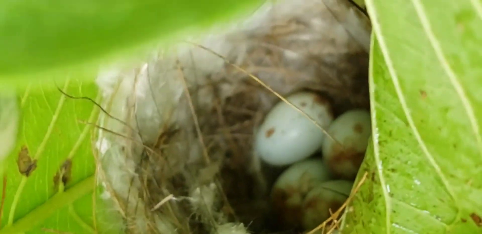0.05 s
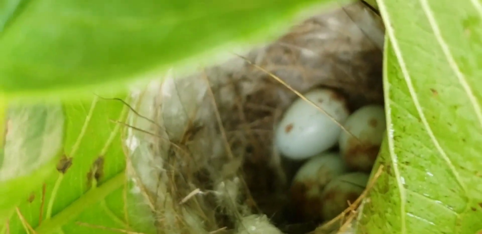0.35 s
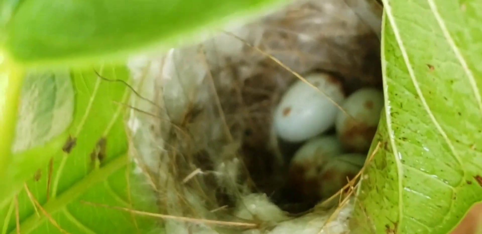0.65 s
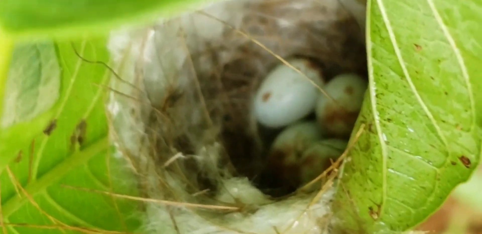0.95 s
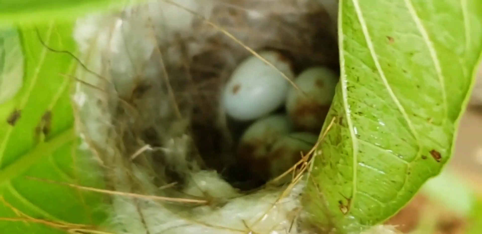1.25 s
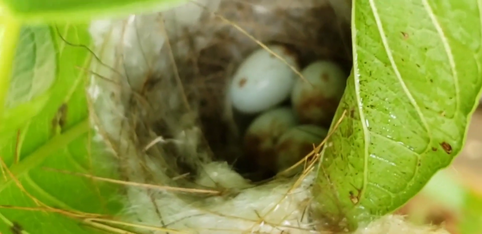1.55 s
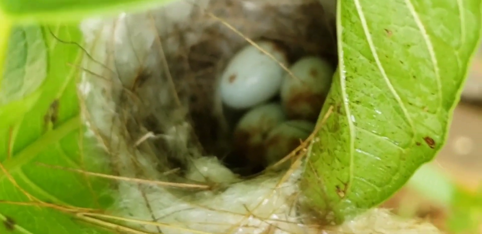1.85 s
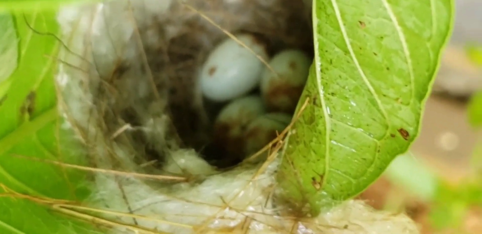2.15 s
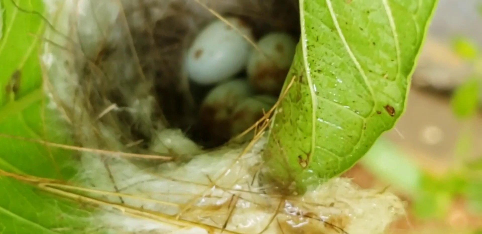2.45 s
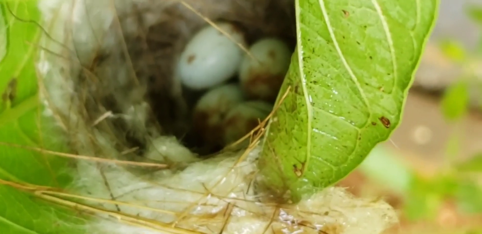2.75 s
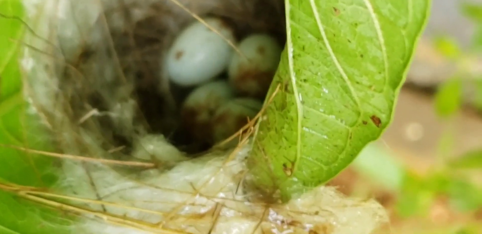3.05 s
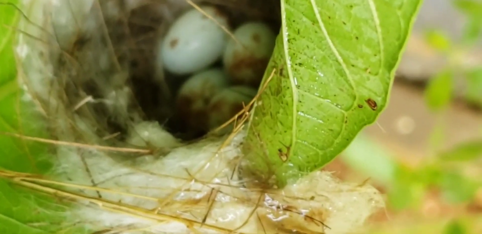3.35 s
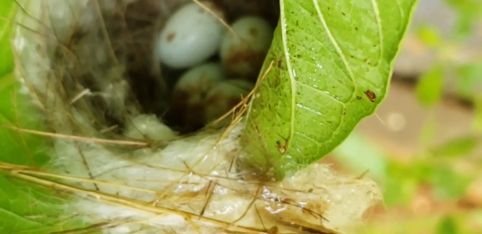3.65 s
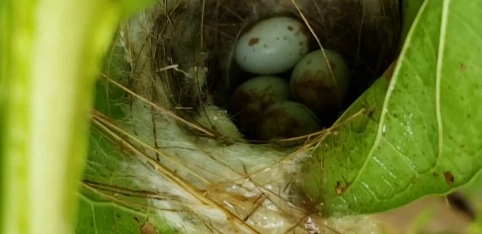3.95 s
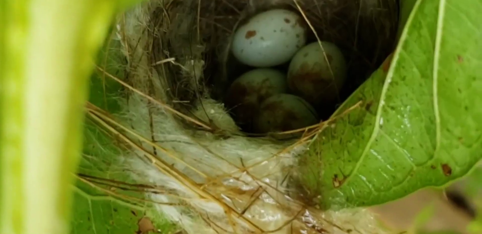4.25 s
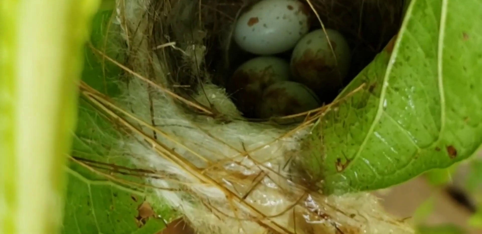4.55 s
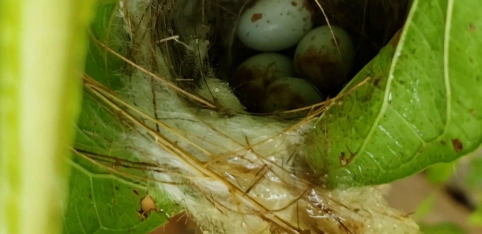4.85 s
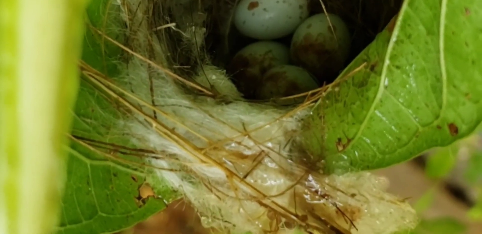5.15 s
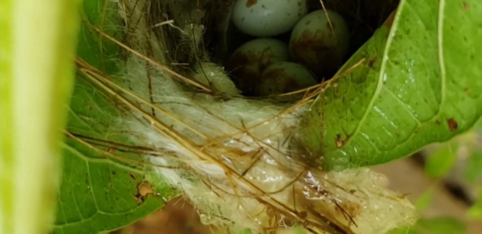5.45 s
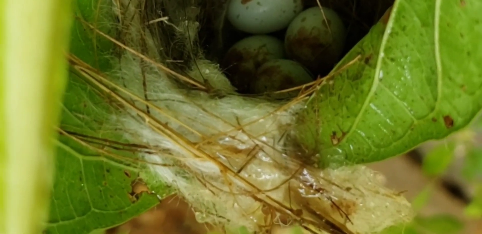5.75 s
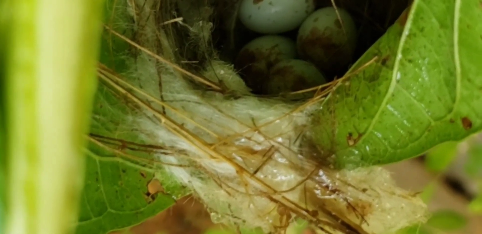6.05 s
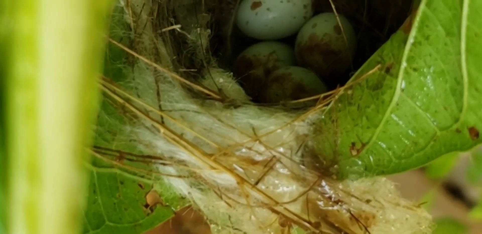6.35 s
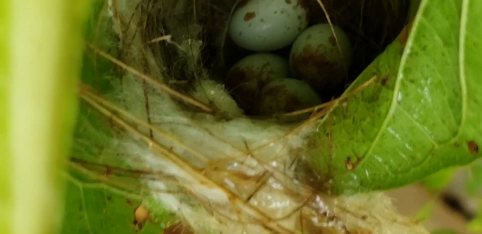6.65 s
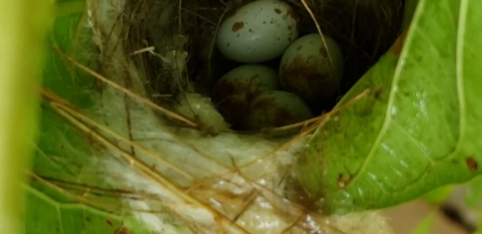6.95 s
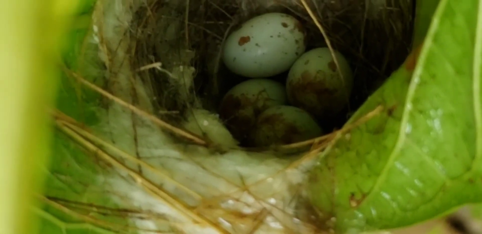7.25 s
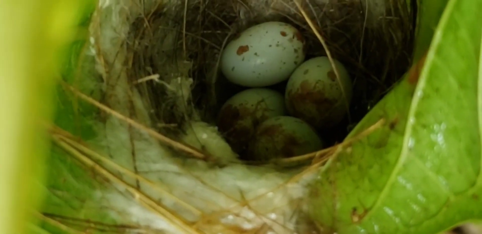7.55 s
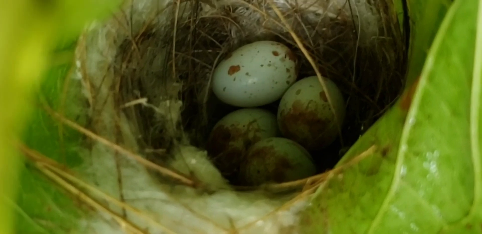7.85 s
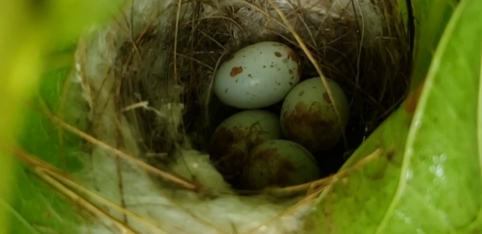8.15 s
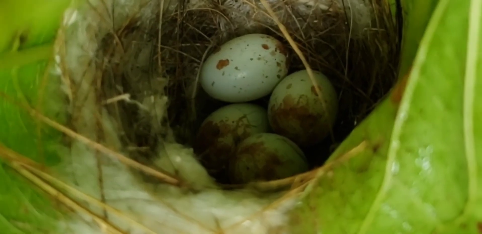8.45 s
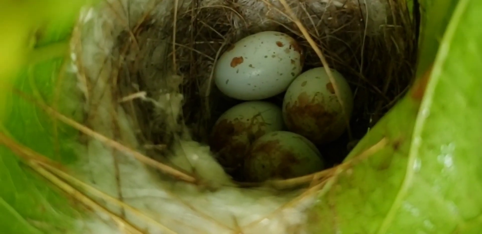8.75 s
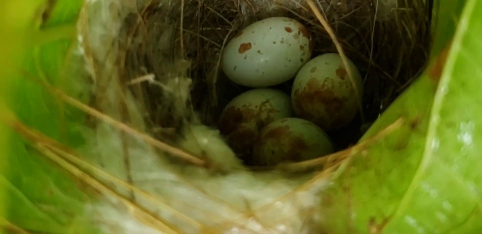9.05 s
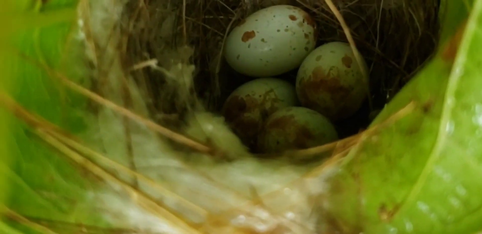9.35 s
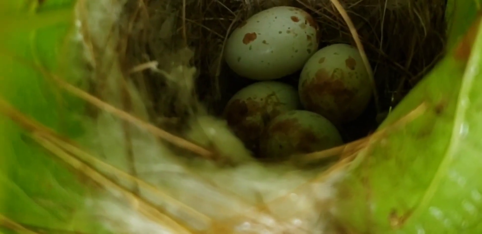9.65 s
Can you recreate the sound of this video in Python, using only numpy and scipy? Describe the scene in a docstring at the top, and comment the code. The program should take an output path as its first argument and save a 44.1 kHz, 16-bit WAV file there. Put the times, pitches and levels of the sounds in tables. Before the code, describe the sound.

A nearby small bird whistles the same rising and falling chirp about three times a second, in two runs split by a pause and a brief dropout. Other birds whistle and warble further away in the garden, over soft air and insect hiss. Handling adds low rumble, a few taps and leafy rubs at the microphone, most of all toward the end, when a far engine drones and picks up speed.

```python
"""A small bird close by in a garden whistles a rise and a fall, over and over; leaves scatter it and a wall
echoes it. Further off, a second bird and a warbler repeat their own phrases among distant calls, over air,
insects and a low rumble. At the microphone a hand shifts on the camera, which taps and brushes against
leaves. The sound drops out once and the garden swells back slowly. Near the end a far motor speeds up."""
import sys
import numpy as np
from scipy import signal
from scipy.fft import rfft, irfft, next_fast_len
from scipy.io import wavfile
from scipy.ndimage import uniform_filter1d

SR = 44100
rng = np.random.default_rng(int(sys.argv[2]) if len(sys.argv) > 2 else 0)


def unload_wav(signal):
    """Save mono or channel-first audio to the path in sys.argv[1] as 16-bit WAV at rate SR, clipped to [-1, 1]."""
    wavfile.write(
        sys.argv[1],
        SR,
        np.round(np.clip(np.atleast_2d(signal).T, -1, 1) * 32767).astype(np.int16),
    )


N = 433062
T = np.arange(N) / SR
DROPOUT_START_S, DROPOUT_END_S = 3.862, 3.984


def undb(db):
    """Decibels to gain."""
    return 10 ** (np.asarray(db) / 20)


def curves(rows):
    """Each column of a timed table, joined by straight lines."""
    times, *columns = np.transpose(rows)
    return [np.interp(T, times, column) for column in columns]


def add(track, start_s, sound):
    """Mix a sound into a track."""
    i = int(round(start_s * SR))
    a, b = max(i, 0), min(i + sound.shape[-1], N)
    if b > a:
        track[..., a:b] += sound[..., a - i:b - i]


def pan(db):
    """Left and right gains for a level difference; positive is to the left."""
    return undb(np.array([[.5], [-.5]]) * db)


def late(x, delay_s):
    """The same sound a little later."""
    return np.interp(T - delay_s, T, x, left=0)


def wander(rate_hz):
    """Smooth random drift with a spread near 1."""
    hold = int(SR / rate_hz)
    steps = np.repeat(rng.standard_normal(N // hold + 1), hold)
    return 1.3 * uniform_filter1d(uniform_filter1d(steps, hold), hold)[:N]


def colour(x, spectrum):
    """Shape a signal by (freq_hz, level_db) points, at rms 1."""
    hz, db = np.transpose(spectrum)
    size = next_fast_len(x.shape[-1])
    bins_hz = np.arange(size // 2 + 1) * SR / size
    gain = undb(np.interp(np.log(bins_hz + 1), np.log(hz), db))
    shaped = irfft(rfft(x, size) * gain, size)[..., :x.shape[-1]]
    return shaped / np.sqrt(np.mean(shaped ** 2))


def noise(spectrum, side_db, size=N):
    """Coloured stereo noise; side_db sets its width."""
    mid, side = rng.standard_normal((2, size))
    return colour(mid + undb(side_db) * side * np.array([[1], [-1]]), spectrum)


def stroke(start_s, length_s):
    """Contact pressure: quick to build, slower to ease off."""
    return np.interp(T, start_s + length_s * np.array([0, .18, .56, 1]), [.0024, 1.01, .5, .0026])


def scatter(x, delay_s, t60_s, build_s):
    """A cloud of small reflections that builds up and dies away, different at each microphone."""
    t = np.arange(int(.8 * SR)) / SR
    age = np.maximum(t - delay_s, 0)
    envelope = (1 - np.exp(-age / build_s)) * undb(-60 * age / t60_s)
    response = (rng.standard_normal((2, len(t))) * envelope)[:, age < t60_s]
    response /= np.sqrt(np.sum(response ** 2, axis=1, keepdims=True))
    return signal.oaconvolve(x[None], response, axes=1)[:, :N]


def bounce(sound, echo_db, reach_s=.012):
    """A bird turns its head, so each note meets other near surfaces and beats against their echoes."""
    response = np.zeros((2, int(reach_s * SR) + 16))
    response[:, 0] = 1
    for lag, skew in rng.random((3, 2)):
        left = int((.2 + .8 * lag) * reach_s * SR)
        right = left + int(skew * 8)
        response[[0, 1], [left, right]] += undb(echo_db)
    return signal.fftconvolve(sound[None], response, axes=1)


def further_off(voice):
    """A voice further from the microphone has more of the garden in its sound."""
    leaves = undb(-1) * scatter(voice.mean(0), delay_s=.002, t60_s=.22, build_s=.005)
    garden = undb(-6) * scatter(voice.mean(0), delay_s=.025, t60_s=.4, build_s=.012)
    return undb(-3) * (voice + leaves + garden)


def whistle(shape, ratio=1, waver=.01, flutter_db=3):
    """A tone gliding through (time_s, pitch_hz, level_db) points; pitch wavers and strength flutters."""
    times, hz, db = np.transpose(shape)
    t = np.arange(int(times[-1] * SR)) / SR
    knots = np.linspace(0, times[-1], 24)
    wobble, flutter = (np.interp(t, knots, row) for row in rng.standard_normal((2, 24)))
    pitch = np.interp(t, times, hz) * ratio * (1 + waver * wobble)
    strength = undb(np.interp(t, times, db) + flutter_db * flutter) * signal.windows.tukey(len(t), .08)
    return np.sqrt(2) * np.sin(2 * np.pi * np.cumsum(pitch) / SR) * strength


def slur(length_s, start_hz, end_hz, waver):
    """One plain gliding note that swells and fades."""
    shape = [(0, start_hz, -9), (length_s / 2, (start_hz + end_hz) / 2, 0), (length_s, end_hz, -9)]
    return whistle(shape, waver=waver)


def hard_whistle(shape, ratio):
    """A hard-blown syrinx wavers more and adds its octave."""
    tone = whistle(shape, ratio, waver=.014)
    octave = tone ** 2 - uniform_filter1d(tone ** 2, size=64)
    return bounce(tone + undb(-25) * octave, echo_db=-9.5)


# The whole garden at the microphone: time_s, level_db
GARDEN_LEVEL = [(3.86, 0), (3.98, -9.5), (5.6, -10), (6.2, -2.5), (6.7, .8), (7.3, 1.5), (9.8, 2.2)]
def swell():
    """The garden's gain sinks at the dropout and comes back slowly."""
    return undb(curves(GARDEN_LEVEL)[0])


# Open air, all round: freq_hz, level_db
AIR_SPECTRUM = [(60, -11), (150, -6.5), (220, 7), (330, -8.5), (550, -12.5), (800, -11.5), (1050, -20),
                (1900, -19.5), (3000, -10), (5900, -14), (7500, -26.5), (11000, -28.5), (15500, -18)]
def air():
    """A wide, restless hiss."""
    return noise(AIR_SPECTRUM, side_db=-3) * undb(-62.5 + 1.29 * wander(7.7))


# Insects, off to the left: freq_hz, level_db
INSECT_SPECTRUM = [(7800, -29), (8700, -15.5), (9300, -0.5), (9800, -8.5), (11200, -27.5)]
def insects():
    """A steady, high band of noise."""
    return noise(INSECT_SPECTRUM, side_db=-8.5) * undb(-76 + .6 * wander(25)) * pan(7.8)


# Low rumble at the microphone: freq_hz, level_db
RUMBLE_SPECTRUM = [(20, -27), (40, -16), (62, -1.5), (120, -12.5), (200, -22.5), (400, -52)]
# The hand jolts the camera case: start_s, length_s, level_db
JOLTS = [(0, 1.2, -61), (1.18, .3, -50), (1.45, 1.3, -55), (2.68, .5, -51), (3, .5, -60), (6.1, .9, -62),
         (8.8, 1.3, -51)]
def rumble(floor_gain):
    """A constant low rumble that grows with each jolt of the hand."""
    floor = floor_gain * undb(-60 + 1.5 * wander(5))
    jolts = sum(undb(db) * stroke(start_s, length_s) for start_s, length_s, db in JOLTS)
    return (floor + jolts) * noise(RUMBLE_SPECTRUM, side_db=-12)


# A motor in the distance: time_s, firing_hz, level_db
MOTOR_RUN = [(6.7, 59, -68), (7, 58.8, -54), (8.2, 58.16, -51), (8.8, 58.98, -54), (9.5, 68.75, -45.5),
             (9.7, 75, -39)]
# Its drone: firing_multiple, level_db
MOTOR_ORDERS = [(1, 1), (1.5, -8), (2, -19), (3, -21)]
# Its exhaust: freq_hz, level_db
EXHAUST_SPECTRUM = [(60, -12), (110, 2), (220, 0), (330, -6), (470, -4), (800, -22), (1500, -45)]
def motor():
    """A far engine drones, then speeds up; only its lowest orders and a dull exhaust roar carry."""
    firing_hz, db = curves(MOTOR_RUN)
    gain = undb(db) * (T > MOTOR_RUN[0][0])
    phase = 2 * np.pi * np.cumsum(firing_hz * (1 + .012 * wander(12))) / SR
    drone = sum(undb(order_db + 2.6 * wander(12)) * np.sin(k * phase) for k, order_db in MOTOR_ORDERS)
    roar = undb(-59) * noise(EXHAUST_SPECTRUM, side_db=-5) * np.sqrt(gain / gain.max())
    return drone * gain * np.sqrt(2) + roar


# Birds far from the microphone: start_s, length_s, start_hz, end_hz, level_db
FAR_CALLS = [(0, .08, 2250, 1800, -62), (0, .08, 4800, 3900, -62), (.225, .085, 4750, 3800, -59),
             (.59, .05, 4000, 4150, -62), (.766, .65, 1558, 1584, -68), (.95, .35, 2120, 1800, -66),
             (1.535, .055, 4850, 4400, -59), (1.78, .14, 1440, 1390, -70), (2.004, .078, 4710, 4620, -55),
             (3.068, .0376, 3340, 3190, -50), (7.84, .14, 3900, 3880, -57), (9.22, .38, 2030, 1900, -57.5)]
def far_birds(waver_hz=55, hoarseness=.6, chatter_notes=70):
    """Hoarse slurs and random chatter, blurred by reflections."""
    voice = np.zeros(N)
    for start_s, length_s, start_hz, end_hz, db in FAR_CALLS:
        add(voice, start_s, undb(db) * slur(length_s, start_hz, end_hz, waver=waver_hz / start_hz))
    for when, length, pitch, glide, faintness in rng.random((chatter_notes, 5)):
        hz = 3000 + 1800 * pitch
        chirp = slur(.04 + .05 * length, hz, hz * (1 - .22 * glide), waver=.015)
        add(voice, when * T[-1], undb(-63 - 10 * faintness) * chirp)
    voice *= 1 + hoarseness * wander(260)
    return undb(-5) * voice + undb(-3) * scatter(voice, delay_s=.002, t60_s=.24, build_s=.0022)


def tooting_bird(first_s=3.94, period_s=.586, pitch_hz=775):
    """Even toots far off to the right, heard only through their reflections."""
    toots = np.zeros(N)
    for start_s in np.arange(first_s, T[-1], period_s):
        add(toots, start_s, undb(-66.5) * slur(.07, pitch_hz, pitch_hz, waver=.02))
    return scatter(toots, delay_s=.002, t60_s=.2, build_s=.002) * pan(-10)


# One warble, from the leaves to the right: time_s, pitch_hz, level_db
WARBLE = [(0, 1043, -20), (.03, 1190, -7), (.06, 1240, -4), (.088, 1140, -7), (.128, 1335, 3),
          (.16, 1150, -5), (.19, 950, -15)]
def warbler(first_s=6.935, end_s=7.9, period_s=.286, warm_up_s=.42):
    """Low warbles, each higher and louder as the bird warms up."""
    voice = np.zeros((2, N))
    for start_s in np.arange(first_s, end_s, period_s):
        cold = np.exp((first_s - start_s) / warm_up_s)
        warble = hard_whistle(WARBLE, ratio=1.02 * (1 - .19 * cold))
        add(voice, start_s, undb(-58.5 - 9 * cold) * warble)
    leaves = undb(-4) * scatter(voice.mean(0), delay_s=.004, t60_s=.16, build_s=.004)
    return (voice + leaves) * pan(-9)


# Thin, high notes, one long and one short: time_s, pitch_hz, level_db
SEEP = [(0, 7150, -9), (.015, 6900, -3), (.03, 6400, -1), (.055, 6100, 3), (.092, 6230, 2),
        (.16, 6280, -14)]
TSIP = [(0, 6960, -30.5), (.015, 6540, 10), (.035, 6150, 1.5), (.055, 5750, -24)]
# Birds in the middle distance: start_s, shape, pitch_ratio, level_db
NEIGHBOUR_CALLS = [(2.298, TSIP, 1, -56), (7.807, TSIP, 0.902, -60.5), (9.558, SEEP, 1.02, -45),
                   (9.778, SEEP, 1.02, -51)]
def neighbours():
    """Single hard-blown calls."""
    voice = np.zeros((2, N))
    for start_s, shape, ratio, db in NEIGHBOUR_CALLS:
        add(voice, start_s, undb(db) * hard_whistle(shape, ratio))
    return voice


# The second bird's notes: time_s, pitch_hz, level_db
PIP = [(0, 3660, -12), (.018, 3380, -7), (.026, 3900, -7), (.036, 3600, -14), (.047, 4760, -30),
       (.054, 4650, -2), (.064, 4480, 3), (.07, 4320, -15)]
SLUR = [(0, 5150, -8), (.007, 4646, 4), (.015, 4033, 2), (.022, 3455, -5), (.04, 3080, -6),
        (.058, 2860, -7)]
SLUR_HOLD = [(0, 4944, -2), (.01, 4400, 1), (.025, 4150, -2), (.045, 4054, -1), (.06, 4090, -8)]
# Its phrase, with a faint echo of the main slur 58 ms later: offset_s, shape, level_db
PHRASE = [(-.073, PIP, 0), (0, SLUR, 0), (.056, SLUR_HOLD, -3), (.058, SLUR, -8)]
# Its bouts, in the middle distance: first_s, end_s, period_s, level_db
PHRASE_BOUTS = [(2.545, 3.7, .335, -54), (6.008, 8.5, .34, -52)]
def second_bird():
    """One quick whistled phrase, repeated at an even pace and ending on a held note."""
    voice = np.zeros((2, N))
    for first_s, end_s, period_s, db in PHRASE_BOUTS:
        for start_s in np.arange(first_s, end_s, period_s):
            for offset_s, shape, part_db in PHRASE:
                add(voice, start_s + offset_s, undb(db + part_db) * bounce(whistle(shape), echo_db=-7.5))
            add(voice, start_s + .125, undb(db - 8) * slur(.06, 4080, 4000, waver=.012))
    return voice


# Taps on camera and leaves, at the microphone: start_s, level_db, centre_hz, t60_s, pan_db
TAPS = [(1.212, -39, 280, .07, 0), (1.218, -41, 3000, .028, 3), (1.262, -47.5, 895, .04, -1),
        (2.221, -39.5, 850, .055, 13), (2.849, -48.5, 13000, .02, 6), (2.848, -48, 400, .04, 11),
        (6.123, -53, 1500, .015, 0), (6.823, -41, 13000, .004, 5), (6.839, -37.5, 13000, .003, 5),
        (8.002, -51, 2500, .01, -1), (8.667, -48, 2500, .01, 0), (9.565, -46, 1800, .03, -1)]
def taps():
    """Each contact is a short, damped burst of noise."""
    out = np.zeros((2, N))
    t = np.arange(4096) / SR
    for start_s, db, hz, t60_s, pan_db in TAPS:
        spectrum = [(hz / 8, -10), (hz / 1.63, 0), (hz * 1.06, -2), (hz * 3, -17), (hz * 10, -32)]
        burst = noise(spectrum, side_db=-2.5, size=len(t))
        add(out, start_s, undb(db - 60 * t / t60_s) * burst * pan(pan_db))
    return out


# Leaves on the camera, at the microphone: start_s, length_s, level_db, treble_over_body_db
BRUSHES = [(2.2, .18, -54, -2), (2.684, .42, -61, -7), (2.81, .31, -59, 8), (3.385, .22, -73, 18),
           (6.222, .21, -65.5, -1), (6.672, .32, -64.5, 6), (9.01, .17, -54.5, -4), (8.86, 1.7, -58.5, -10),
           (9.539, .22, -61, 8)]
# Their body to the right and their treble to the left: freq_hz, level_db
BRUSH_BODY = [(100, -2), (420, 1), (620, -3.5), (1000, -5), (2000, -5.5), (4000, -9.5), (8000, -37.5)]
BRUSH_TREBLE = [(1500, -20), (4000, 5), (6000, 0), (8000, -6), (12000, 3.5), (15500, 2)]
def leaf_brushes(slips):
    """Leaves drag over the case in tiny slips: a soft rub with a grainy top."""
    grain_db = 2.4 * np.repeat(rng.exponential(size=N // 16 + 1), 16)[:N]
    grains = rng.standard_normal((2, N)) * undb(grain_db)
    body = noise(BRUSH_BODY, side_db=-1.5) * undb(1.1 * wander(45)) * pan(-4.5)
    treble = colour(grains, BRUSH_TREBLE) * pan(9.4)
    out = np.zeros((2, N))
    for start_s, length_s, db, tilt_db in BRUSHES:
        rub = undb(db - tilt_db / 2) * body + undb(db + tilt_db / 2) * treble
        out += stroke(start_s, length_s) * slips * rub
    return out


# The hand on the camera, at the microphone: start_s, length_s, level_db, centre_hz
SCUFFS = [(3.69, .17, -53, 340), (8.74, .4, -53, 190), (8.97, .26, -51, 1050), (9.03, .42, -51.5, 420),
          (9.53, .5, -57, 380)]
def grip_scuffs(slips, lumps_db=2):
    """The grip shifts and slips with dull, lumpy scuffs."""
    out = np.zeros((2, N))
    for start_s, length_s, db, hz in SCUFFS:
        hollow = [(hz / 3, -14), (hz, 0), (hz * 2, -10), (hz * 4, -30), (hz * 10, -50)]
        pressure = stroke(start_s, length_s) * undb(db + lumps_db * wander(40))
        out += pressure * slips * noise(hollow, side_db=-3)
    return out


# Where the main bird sits as the camera turns: time_s, pan_db
CAMERA_AIM = [(0, 3), (2.6, 2), (4, 2.5), (6.2, 2.5), (7.3, -1), (9.8, -2.5)]
def path_to_microphone(near, rises, falls, left_lag_s=.0004, ground_s=.0051, wall_s=.114):
    """The ground's quick echo makes glides throb; leaves scatter the rise most; a wall answers later."""
    voice = rises + falls
    near = np.array([late(near[0], left_lag_s), near[1]])
    ground = undb(-2.2) * np.array([late(voice, ground_s + left_lag_s), late(voice, ground_s)])
    leaves = undb(2.5) * scatter(rises, delay_s=.0037, t60_s=.19, build_s=.0045)
    leaves += undb(-5) * scatter(falls, delay_s=.0022, t60_s=.17, build_s=.0016)
    wall = undb(-11.5) * scatter(voice, delay_s=wall_s, t60_s=.22, build_s=.009)
    garden = undb(-10) * scatter(voice, delay_s=.02, t60_s=.66, build_s=.015)
    pan_db, = curves(CAMERA_AIM)
    return undb(-3.5) * (near + ground + leaves + wall + garden) * pan(pan_db)


# The main bird's notes: time_s, pitch_hz, level_db
RISE = [(0, 2600, -12), (.006, 3700, -3), (.012, 4770, -1), (.018, 5370, 0), (.025, 5600, -2.5),
        (.031, 5670, -9)]
FALL = [(0, 4350, 4.5), (.007, 3680, 4), (.024, 3130, .5), (.045, 2890, 1.5), (.066, 2740, 4),
        (.088, 2630, -1), (.106, 2540, -4), (.118, 2480, -15)]
# A falling whistle that ends lower, its loudness rippled by the ground's echo: time_s, pitch_hz, level_db
SECOND_BOUT_FALL = [(0, 4250, 8), (.008, 3650, 4.5), (.02, 3230, -.5), (.036, 2950, 4.5), (.052, 2850, -2),
                    (.068, 2745, -.5), (.094, 2540, 0), (.112, 2420, -12)]
# Its calls, close to the microphone, in two bouts: start_s
CALL_STARTS = [-.036, .318, .671, 1.044, 1.407, 1.766, 2.129, 2.507, 3.986, 4.334, 4.689, 5.05, 5.411,
               5.776, 6.139, 6.492, 6.851, 7.215, 7.569, 7.915, 8.278, 8.634, 9.001, 9.364, 9.737]
def main_bird(break_s=2.5, settle_s=2.0):
    """A rising whistle, then a falling one; the second bout is sung harder."""
    near, rises, falls = np.zeros((2, N)), np.zeros(N), np.zeros(N)
    for start_s in CALL_STARTS:
        second_bout = start_s > DROPOUT_START_S
        # fresh after the pause, the rise is higher and stronger; then it settles
        fresh = second_bout * np.exp(-((start_s - DROPOUT_END_S) / settle_s) ** 2)
        rise_db = -49.7 + 2.2 * second_bout + 3.5 * fresh
        rise = undb(rise_db) * whistle(RISE, ratio=1 + .036 * fresh, waver=.008, flutter_db=2)
        add(rises, start_s, rise)
        add(near, start_s, bounce(rise, echo_db=-4))
        if second_bout or start_s < break_s:  # the first bout breaks off after a rise
            shape = SECOND_BOUT_FALL if second_bout else FALL
            fall = undb(-48.7 + 1.1 * second_bout) * whistle(shape, waver=.008, flutter_db=3.2)
            fall_s = start_s + .111
            add(falls, fall_s, fall)
            add(near, fall_s, bounce(fall, echo_db=-10, reach_s=.028))
    return path_to_microphone(near, rises, falls)


def scene():
    """The birds, the garden behind them, the hand on the camera and the motor."""
    birds = main_bird() + further_off(second_bird() + neighbours())
    birds += warbler() + far_birds() + tooting_bird()
    floor_gain = swell() ** 1.2  # the background sinks and swells more than the birds
    background = floor_gain * (air() + insects()) + rumble(floor_gain)
    handling = taps()
    slips = undb(3.4 * wander(170) + 2 * wander(25) - 1.7)  # uneven friction on the case
    handling += leaf_brushes(slips) + grip_scuffs(slips)
    return birds * swell() + background + handling + motor()


def record(dry, top_hz=15850):
    """The sound drops out for a moment, and the highest treble is cut."""
    live = (T < DROPOUT_START_S) | (T > DROPOUT_END_S)
    gate = uniform_filter1d(live.astype(float), size=64)
    lowpass = signal.ellip(10, .2, 70, top_hz, fs=SR, output="sos")
    return signal.sosfilt(lowpass, dry * gate)


dry = scene()
out = record(dry)
unload_wav(out)
```